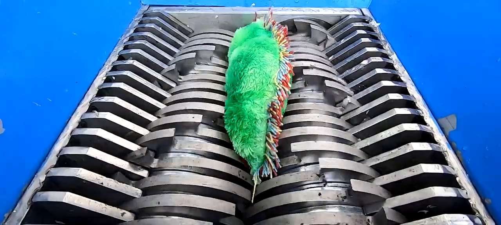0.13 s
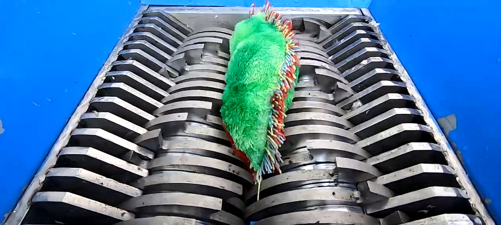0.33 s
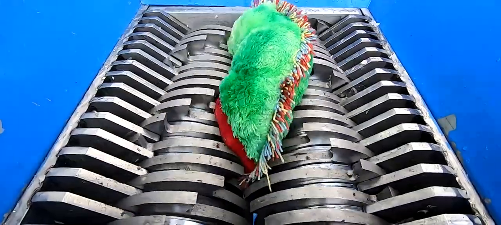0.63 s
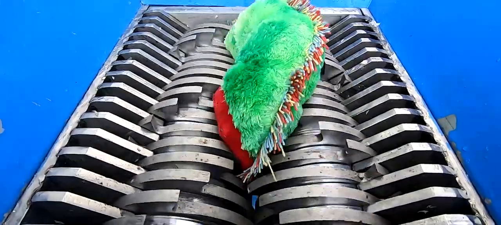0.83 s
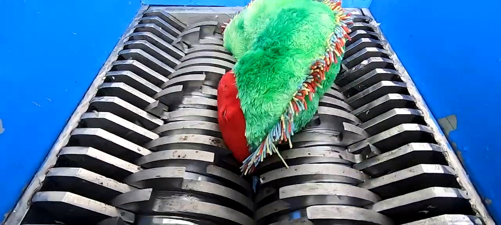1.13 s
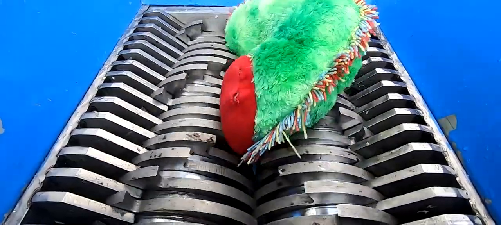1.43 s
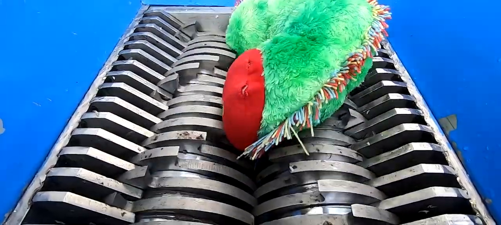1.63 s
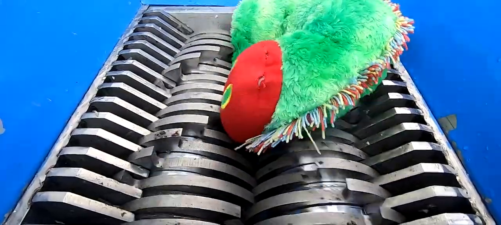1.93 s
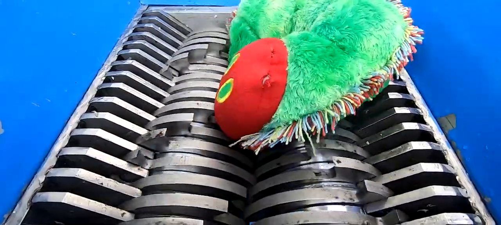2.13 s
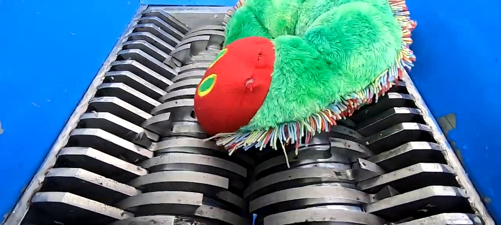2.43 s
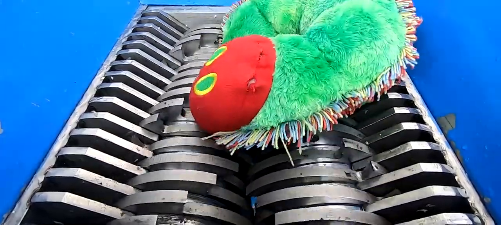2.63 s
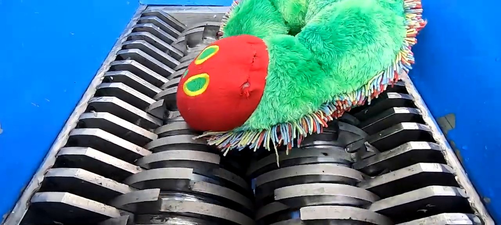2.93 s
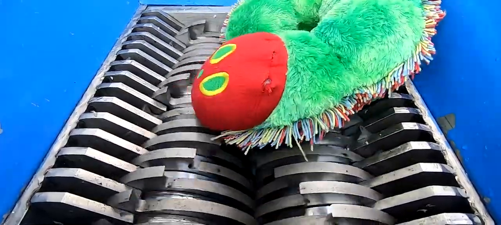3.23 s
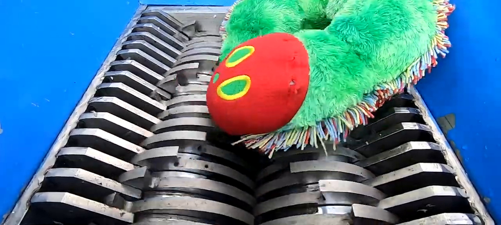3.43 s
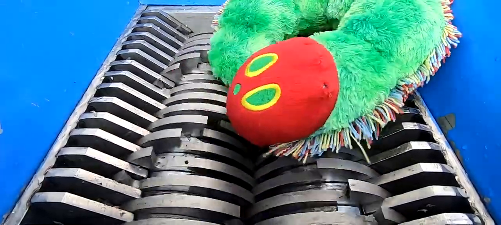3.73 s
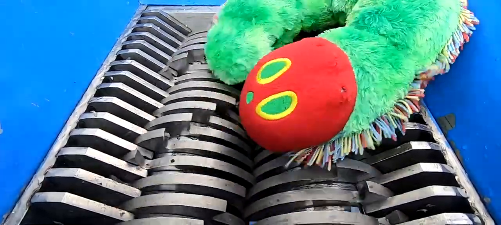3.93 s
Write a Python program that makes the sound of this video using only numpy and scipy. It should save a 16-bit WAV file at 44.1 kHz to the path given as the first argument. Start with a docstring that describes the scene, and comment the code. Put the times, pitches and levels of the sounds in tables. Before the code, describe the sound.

An electric shredder rumbles and rattles close by, its steel cutters rubbing rhythmically and snapping dryly as they work on a plush toy.

```python
"""A throbbing, rattling gearbox and a few dry snaps: an electric twin-shaft shredder runs close by,
a plush toy rolling on its cutter discs. Loaded teeth shake the frame, hardest near 2 s. From then on
a turning part rubs about five times a second and rings the steel housing, at times with a short
stick-slip squeal. Hooks scuff and tick, a shaft knocks twice, the motor's inverter whines near 5 kHz."""
import sys
import numpy as np
from scipy import signal
from scipy.fft import rfft, irfft, next_fast_len
from scipy.io import wavfile
from scipy.ndimage import map_coordinates

SR = 44100
rng = np.random.default_rng(int(sys.argv[2]) if len(sys.argv) > 2 else 0)


def persist_wave(psi):
    """Save psi, clipped to +-1, as 16-bit WAV."""
    counts = np.round(np.clip(psi, -1, 1) * 32767).astype(np.int16)
    wavfile.write(sys.argv[1], SR, np.atleast_2d(counts).T)


N = 180501

# gear mesh: t/s, tooth-rate level/dB, octave level/dB
MESH_LEVELS = [(0.0, -39.5, -32.5), (0.75, -35, -26.5), (1.33, -33, -25), (1.45, -30.5, -33.5),
               (1.5, -35, -22), (1.63, -27, -37), (1.83, -37, -21.5), (1.89, -25, -18.5),
               (2.08, -23.5, -17.5), (2.17, -25, -21), (2.28, -32.5, -27.5), (2.49, -30, -36.5),
               (2.56, -28, -29.5), (2.62, -36, -30), (2.73, -48, -40), (2.96, -42, -34), (3.03, -45.5, -43),
               (3.33, -39.5, -29.5), (4.09, -50, -32.5)]
# faster gear stages: f/Hz, level/dB
STAGE_TONES = [(156.1, -42), (169, -46.5), (230, -47), (414.5, -51.5)]
# drive load: t/s, rumble level/dB, rattle level/dB
LOAD_LEVELS = [(0.0, -36, -33.5), (0.039, -29, -32), (0.591, -27.5, -38), (1.352, -31, -38.5),
               (1.531, -23, -34.5), (1.841, -27, -33.5), (2.041, -18.5, -27), (2.279, -21.5, -36),
               (2.35, -21, -30.5), (2.56, -25, -33.5), (2.631, -22.5, -27.5), (2.719, -35.5, -43.5),
               (2.742, -30.5, -39.5), (3.23, -33, -39.5), (3.252, -25, -38), (3.51, -31, -37.5),
               (3.79, -33, -40.5), (4.09, -29, -37.5)]
# frame shake: multiple of tooth rate, level/dB
MESH_OVERTONES = [(3, -7), (4, -3.5), (5, -5), (6, -9.5), (7, -10.5), (8, -15)]
# dry disc grinding: t/s, level/dB
GRIND_LEVELS = [(0.0, -49), (1.3, -54), (1.58, -49.5), (1.61, -56.5), (1.8, -47), (1.84, -53),
                (1.92, -41.5), (2.14, -44.5), (2.43, -51), (2.97, -50.5), (3.01, -53.5), (3.36, -48.5),
                (3.6, -50.5), (3.98, -49), (4.09, -45)]
# steel housing: f/Hz, width/Hz, level/dB
HOUSING_MODES = [(667, 75, 0), (779, 65, -4), (908, 29, -12.5), (1060, 130, -10), (1319, 20, -10.5),
                 (1402, 12, -13), (1581, 73, -7.5), (1642, 14, -5.5), (2190, 61, -19.5), (2294, 15, -13),
                 (2520, 22, -29)]
# shaft knocks: t/s, level/dB, f/Hz
SHAFT_KNOCKS = [(2.352, -13, 151), (3.251, -14, 134)]
# rubs: t/s, level/dB
STEEL_RUBS = [(.708, -40.5), (1.789, -40), (1.944, -31), (2.135, -30.5), (2.295, -31), (2.608, -35.5),
              (2.785, -34), (2.975, -33.5), (3.165, -31), (3.345, -31.5), (3.54, -32.5), (3.725, -29.5),
              (3.91, -33), (4.09, -34)]
# stick-slip: t/s, f/Hz, level/dB, half length/s
RUB_SQUEALS = [(0.71, 668, -33, 0.0089), (1.941, 1560, -33.5, 0.033), (2.002, 1625, -38, .04),
               (2.109, 1327, -32, 0.024), (2.136, 1570, -32, .025), (2.775, 669, -34, 0.016),
               (2.989, 660, -33, 0.0095), (3.16, 654, -29, 0.0088), (3.158, 1572, -34.5, 0.0087),
               (3.332, 662, -32, 0.03), (3.34, 1570, -30.5, 0.0049), (3.535, 684, -24.5, 0.011),
               (3.532, 1557, -32, 0.0098), (3.722, 679.5, -31, 0.015), (3.718, 1567, -32.5, 0.0052),
               (3.902, 681, -26, 0.011), (3.908, 1585, -36, 0.0057)]
# hooks on plush: t/s, level/dB, rise/s, fall/s, centre f/Hz
HOOK_SCUFFS = [(.066, -31.5, 0.0042, 0.0054, 1100), (2.05, -27, 0.013, 0.083, 453),
               (1.935, -38.5, .04, 0.032, 1950), (2.13, -41.5, 0.026, 0.026, 1830),
               (2.218, -25, 0.019, 0.0031, 990), (2.394, -22, 0.0053, 0.012, 588),
               (2.455, -29.5, 0.0098, 0.012, 690), (2.636, -26, 0.02, 0.0051, 555),
               (2.882, -28, 0.033, 0.0065, 1100), (2.758, -45.5, .005, 0.0045, 3200),
               (3.111, -34, .002, .015, 900), (3.275, -33, 0.0047, .012, 750),
               (3.388, -39.5, 0.0065, .01, 2550)]
# snaps at the cutters: t/s, level/dB, f/Hz
CUTTER_TICKS = [(.035, -32.5, 1700), (0.071, -29.5, 1510), (.135, -33, 1100), (0.19, -31, 1400),
                (.265, -36, 2300), (0.369, -31.5, 2720), (0.377, -38, 2380), (.553, -43, 2380),
                (.588, -47, 3830), (0.8224, -45, 3600), (1.1775, -43, 4000), (1.5354, -38, 2500),
                (1.5762, -42, 3600), (2.297, -44, 3940), (2.567, -56, 6100), (2.987, -42.5, 3100)]
# inverter centre tone: t/s, level/dB
CARRIER_LEVELS = [(0.0, -54.5), (0.7, -63), (1.5, -64.5), (2.2, -59.5), (3.0, -64.5), (4.09, -60)]
# rest of the whine: t/s, level/dB
WHINE_LEVELS = [(0.0, -51), (0.74, -57.5), (1.02, -55), (1.76, -59.5), (1.95, -55.5), (4.09, -56.5)]
# whine sidebands: offset/spacings, level/dB
SIDEBANDS = [(-11, -13), (-8, -4), (-5, 0), (-3, -5), (-1, -5), (1, -8), (2, -8), (3, -2), (5, -10),
             (8, -9), (11, -13)]
# sideband spacing: t/s, f/Hz
SIDEBAND_SPACING = [(0.0, 23.4), (0.7, 24.5), (4.09, 25.0)]
# noise spectra: f/Hz, relative density/dB
RUMBLE_SPECTRUM = [(12, -19.5), (24, -2.5), (36, -12.5), (52, -3.5), (75, -1), (102, 0), (130, 1),
                   (175, -3.5), (215, -7), (280, -19), (500, -78)]
RATTLE_SPECTRUM = [(130, -31.5), (230, 3), (300, 1), (420, -2.5), (560, -3), (720, -4.5), (900, -10),
                   (1300, -19), (2000, -25.5), (4000, -60)]
FRICTION_SPECTRUM = [(400, -29.5), (750, 11), (1100, 11), (1600, 8), (2000, 5), (2600, 2), (3200, -7.5),
                     (3700, -5.5), (4100, -3.5), (4600, -14), (5600, -26), (6500, -43.5), (7300, -36)]
SNAP_SPECTRUM = [(500, -5), (1200, 11), (2500, -3.5), (4000, -9.5), (6000, -13), (7200, -34)]
CRACKLE_SPECTRUM = [(200, -11.5), (500, -2), (1200, 3), (2500, -4), (4000, -11), (6000, -28.5), (7200, -42)]
HISS_SPECTRUM = [(4300, -53.5), (4700, -9), (4950, -0.5), (5220, -5), (5450, -13), (6000, -34),
                 (6700, -22.5), (7020, -15.5), (7250, -30)]


def gear_hum(mesh_turns, sway_db=4, flutter_db=2, waver_db=2):
    """Tooth rate and octave, uneven until load presses the teeth together; tones of faster stages."""
    first_db, octave_db = curves(MESH_LEVELS)
    play = 1 - 0.8 * strain()
    octave_gain = amp(octave_db + sway_db * play * wobble(8))
    octave = octave_gain * tone(2 * mesh_turns + 0.12 * play * wobble(19))
    throb = amp(first_db) * tone(mesh_turns) + octave
    stages = sum(amp(db + waver_db * wobble(6.2)) * tone(hz * clock() + 0.16 * wobble(6))
                 for hz, db in STAGE_TONES)
    return throb * amp(flutter_db * play * wobble(22)) + stages


def frame_rumble(mesh_turns, in_step_db=-4, loose_db=-1):
    """Loaded teeth shake the frame, partly in step with the mesh, partly in loose knocks."""
    level_db, _ = curves(LOAD_LEVELS)
    in_step = unit(sum(amp(db) * tone(k * mesh_turns + 0.18 * wobble(20)) for k, db in MESH_OVERTONES))
    loose = coloured(contacts(rate_hz=900, scatter_db=1.5), RUMBLE_SPECTRUM)
    return amp(level_db) * (amp(in_step_db) * in_step + amp(loose_db) * loose)


def frame_drone(hz=127.9, level_db=-25.5, start_s=1.47, attack_s=0.066, hold_s=0.27, release_s=0.24):
    """One frame mode drones once, as the load comes on."""
    envelope = np.interp(clock(), np.cumsum([start_s, attack_s, hold_s, release_s]), [0, 1, 1, 0])
    return amp(level_db) * envelope * tone(hz * clock() + 0.075 * wobble(13.3))


def rattle_and_grind(mesh_turns, bite_db=1.5, flutter_db=1.73):
    """Gears rattle and ring the housing, discs grind; under load the noise pulses with each tooth."""
    _, rattle_db = curves(LOAD_LEVELS)
    grind_db, = curves(GRIND_LEVELS)
    bite = unit(amp(bite_db * strain() * tone(mesh_turns)))
    rattle = amp(2) * coloured(contacts(rate_hz=6000, scatter_db=3), RATTLE_SPECTRUM)
    ring = amp(-12) * unit(filtered(contacts(rate_hz=6000, scatter_db=2), housing))
    friction = coloured(contacts(rate_hz=14000, scatter_db=3), FRICTION_SPECTRUM)
    friction *= amp(flutter_db * wobble(60))
    grit = amp(-7) * coloured(contacts(rate_hz=180, scatter_db=1), FRICTION_SPECTRUM)
    return bite * (amp(rattle_db) * (rattle + ring) + amp(grind_db + 5) * (friction + grit))


def shaft_knocks(attack_s=0.0025, t60_s=0.1):
    """A shaft jumps across its play and thumps the frame."""
    out = np.zeros(N)
    for at_s, db, hz in SHAFT_KNOCKS:
        age_s = np.maximum(clock() - at_s, 0)
        out += amp(db - 60 * age_s / t60_s) * (1 - np.exp(-age_s / attack_s)) * tone(hz * age_s)
    return out


def steel_rubs(light_rise_s=0.046, light_load_db=-29.5, doubling_db=13.5, release_ratio=0.45):
    """Steel rasps on steel and rings the housing: slow build, slower under load, fast release."""
    def tilted_housing(hz):
        tilt_db = 1.5 * np.log2(np.clip(hz, 600, 1700) / 1000)
        return housing(hz) * amp(tilt_db) / (1 + (hz / 3000) ** 4)

    ring = unit(filtered(contacts(rate_hz=6000, scatter_db=4), tilted_housing))
    rasp = amp(-11) * coloured(contacts(rate_hz=9800, scatter_db=2.5), FRICTION_SPECTRUM)
    load_s, load_db, _ = np.transpose(LOAD_LEVELS)
    pressure = np.zeros(N)
    for at_s, db in STEEL_RUBS:
        rise_s = light_rise_s * 2 ** ((np.interp(at_s, load_s, load_db) - light_load_db) / doubling_db)
        offset = (clock() - at_s) / rise_s
        pressure += amp(db - 1) / (1 + np.where(offset < 0, offset ** 2, (offset / release_ratio) ** 4))
    return pressure * (ring + rasp)


def rub_squeals(wander_turns=0.037, rough_turns=0.13):
    """Rubbing steel briefly sticks and slips in step with a housing mode; load roughens it."""
    waver_turns = (wander_turns + rough_turns * strain()) * wobble(110)
    out = np.zeros(N)
    for at_s, hz, db, half_s in RUB_SQUEALS:
        envelope = np.exp(-((clock() - at_s) / half_s) ** 2)
        out += amp(db) * envelope * tone(hz * clock() + waver_turns + rng.random())
    return out


def hook_scuffs(half_width_oct=0.61, top_hz=4500):
    """A hook drags over the plush in a burst of small slips and lets go."""
    def band(hz):
        octaves = np.log2((hz + 1) / centre_hz)
        return 1 / (1 + (octaves / half_width_oct) ** 4) / (1 + (hz / top_hz) ** 4)

    out = np.zeros(N)
    for at_s, db, rise_s, fall_s, centre_hz in HOOK_SCUFFS:
        slips = unit(filtered(contacts(rate_hz=4300, scatter_db=0.5), band))
        out += amp(db) * swell(at_s, rise_s, fall_s) * slips
    return out


def cutter_ticks(snap_q=2.1, crackle_db=-12):
    """Dry snaps between the cutters, each pitched and inside a little crackle."""
    burst = coloured(rng.standard_normal(N), SNAP_SPECTRUM)
    crackle = amp(crackle_db) * coloured(contacts(rate_hz=830, scatter_db=5.5), CRACKLE_SPECTRUM)
    out = np.zeros(N)
    for at_s, db, hz in CUTTER_TICKS:
        snap = unit(signal.lfilter(*signal.iirpeak(hz, snap_q, fs=SR), burst))
        out += amp(db) * swell(at_s, rise_s=0.00031, fall_s=0.0025) * snap
        out += amp(db) * swell(at_s, rise_s=0.005, fall_s=0.025) * crackle
    return out


def inverter_whine(carrier_hz=4963, upper_hz=7037):
    """Switching makes the motor sing: centre tone, sidebands drifting apart, faint upper tone, hiss."""
    def line(hz, offset=0):
        return tone(hz * clock() + offset * spacing_turns + rng.random())

    whine_db, = curves(WHINE_LEVELS)
    carrier_db, = curves(CARRIER_LEVELS)
    spacing_hz, = curves(SIDEBAND_SPACING)
    spacing_turns = np.cumsum(spacing_hz) / SR + 0.015 * wobble(4)
    sidebands = unit(sum(amp(db + 2.5 * wobble(2.1)) * line(carrier_hz, k) for k, db in SIDEBANDS))
    hiss = coloured(rng.standard_normal(N), HISS_SPECTRUM)
    carrier = amp(carrier_db) * line(carrier_hz)
    return carrier + amp(whine_db) * (amp(-3) * sidebands + amp(-24) * line(upper_hz) + amp(-7) * hiss)


def strain():
    """Drive effort, 1 at the heaviest load."""
    _, rattle_db = curves(LOAD_LEVELS)
    return amp(rattle_db - rattle_db.max())


def housing(hz):
    """Complex response of the steel housing: modes of alternating sign."""
    return sum((-1) ** k * amp(db) * 1j * hz * width_hz / (mode_hz ** 2 - hz ** 2 + 1j * hz * width_hz)
               for k, (mode_hz, width_hz, db) in enumerate(HOUSING_MODES))


def contacts(rate_hz, scatter_db):
    """Tiny impacts, random in time and size, rms 1."""
    hit = rng.random(N) < rate_hz / SR
    return unit(hit * np.sign(rng.standard_normal(N)) * amp(scatter_db * rng.standard_normal(N)))


def coloured(x, spectrum):
    """x shaped by a spectrum table, rms 1."""
    points_hz, db = np.transpose(spectrum)
    return unit(filtered(x, lambda hz: amp(np.interp(np.log(hz + 1), np.log(points_hz), db))))


def filtered(x, response):
    """x through a complex frequency response."""
    size = next_fast_len(N + SR // 2)
    return irfft(rfft(x, size) * response(np.fft.rfftfreq(size, 1 / SR)), size)[:N]


def curves(rows):
    """Each column after t, interpolated per sample."""
    times_s, *columns = np.transpose(rows)
    return [np.interp(clock(), times_s, column) for column in columns]


def wobble(rate_hz):
    """Smooth random curve, knots at rate_hz."""
    return map_coordinates(rng.standard_normal(int(N * rate_hz / SR) + 4), [clock() * rate_hz])


def swell(peak_s, rise_s, fall_s):
    """Exponential rise to 1, then decay."""
    t = clock() - peak_s
    return np.exp(-np.abs(t) / np.where(t < 0, rise_s, fall_s))


def tone(turns):
    """Sine, rms 1."""
    return np.sqrt(2) * np.sin(2 * np.pi * turns)


def amp(db):
    """dB to gain."""
    return 10 ** (np.asarray(db) / 20)


def unit(x):
    """x at rms 1."""
    return x / np.sqrt(np.mean(x ** 2) + 1e-20)


def clock():
    """Sample times/s."""
    return np.arange(N) / SR


def scene(mesh_hz=34.8, sag_ratio=0.024):
    """The shredder, mono. Hum, rumble and rattle share one tooth rate, which sags under load."""
    mesh_turns = np.cumsum(mesh_hz * (1 - sag_ratio * strain())) / SR + 0.018 * wobble(5.21)
    drive = gear_hum(mesh_turns) + frame_rumble(mesh_turns) + frame_drone() + rattle_and_grind(mesh_turns)
    events = shaft_knocks() + steel_rubs() + rub_squeals() + hook_scuffs() + cutter_ticks()
    return (drive + events + inverter_whine())[None]


def record(dry):
    """Steep low-pass at 7250 Hz."""
    lowpass = signal.ellip(12, 0.1, 90, 7250, fs=SR, output="sos")
    return signal.sosfilt(lowpass, dry)


dry = scene()
out = record(dry)
persist_wave(out)
```